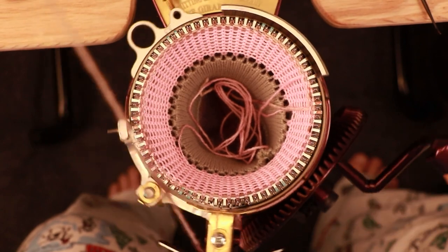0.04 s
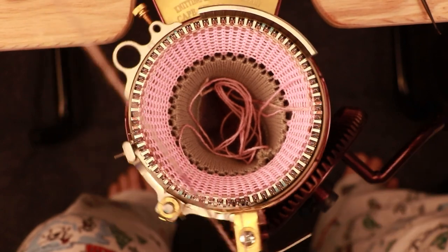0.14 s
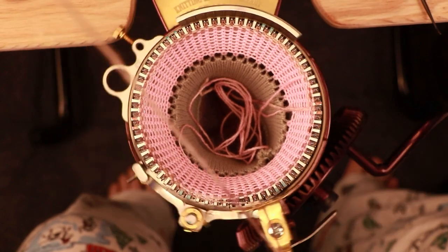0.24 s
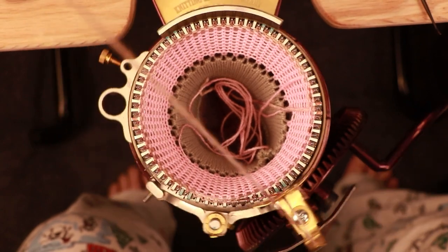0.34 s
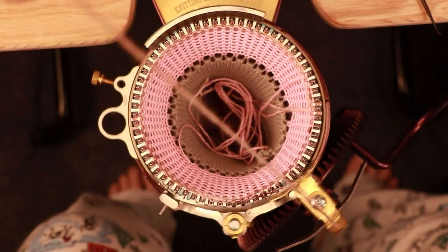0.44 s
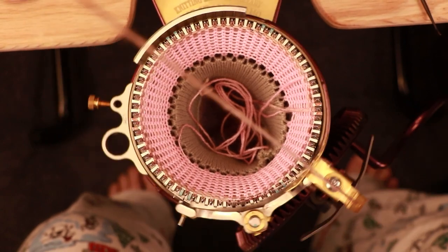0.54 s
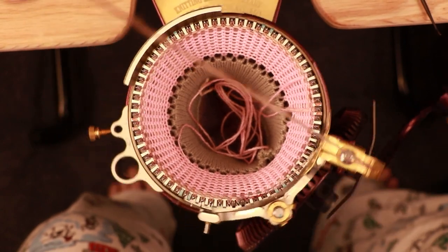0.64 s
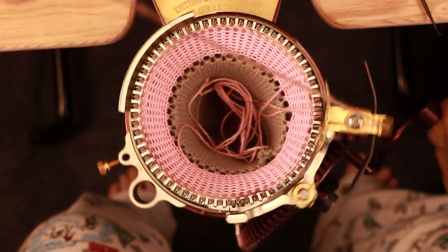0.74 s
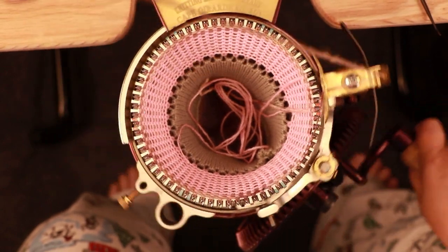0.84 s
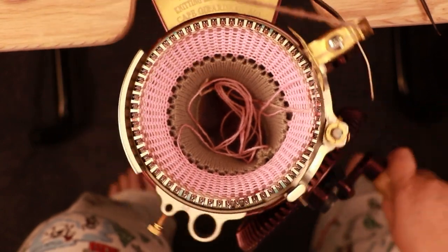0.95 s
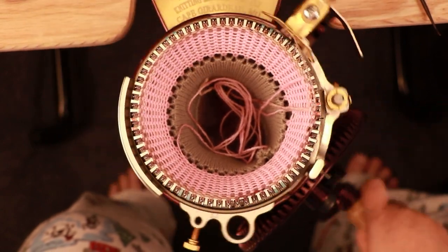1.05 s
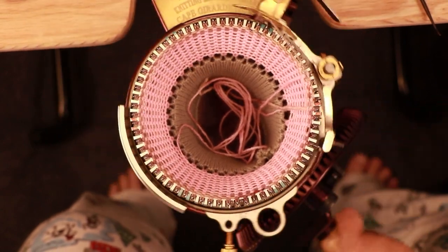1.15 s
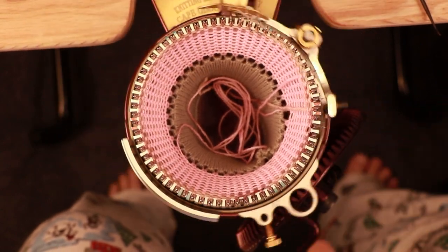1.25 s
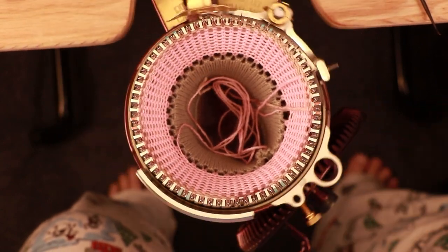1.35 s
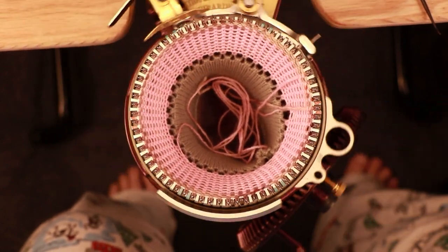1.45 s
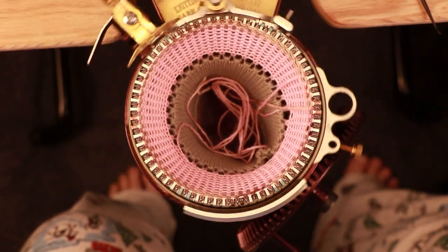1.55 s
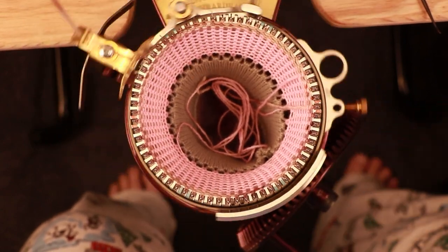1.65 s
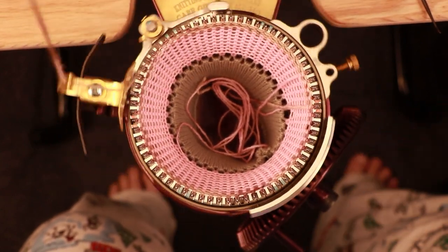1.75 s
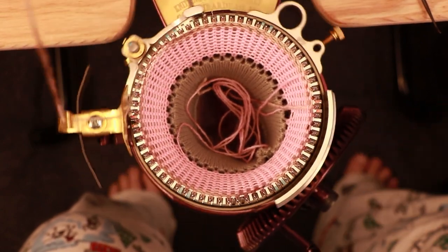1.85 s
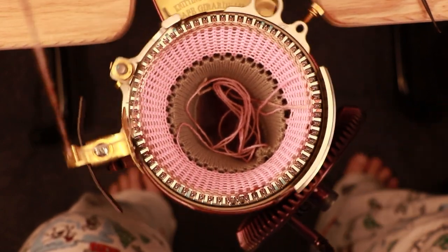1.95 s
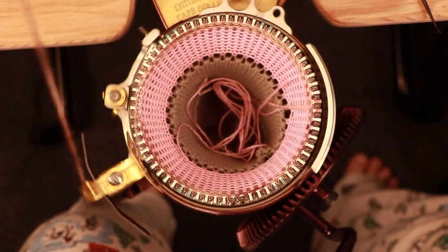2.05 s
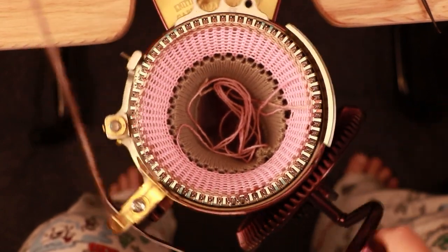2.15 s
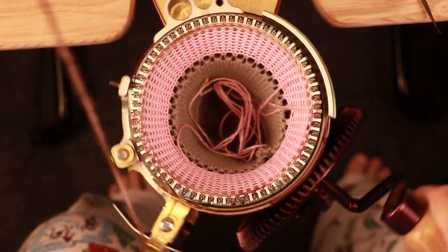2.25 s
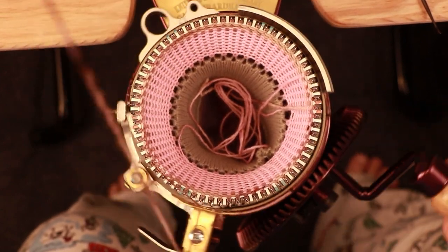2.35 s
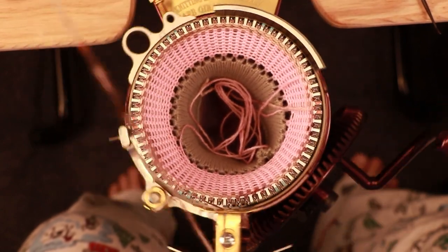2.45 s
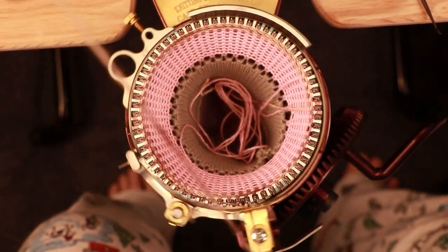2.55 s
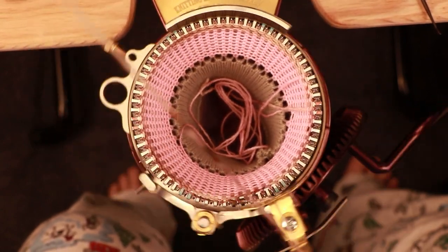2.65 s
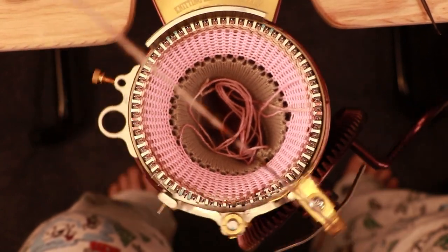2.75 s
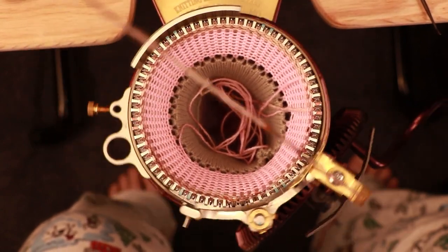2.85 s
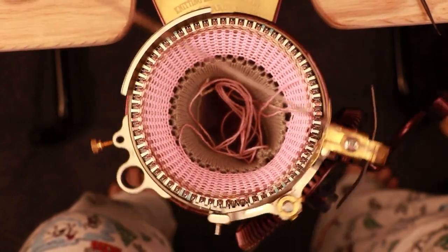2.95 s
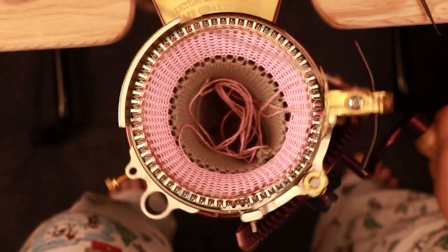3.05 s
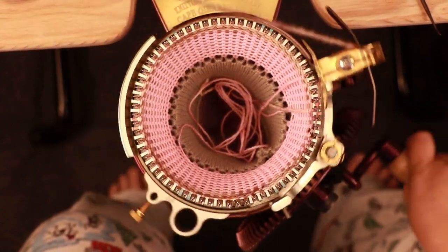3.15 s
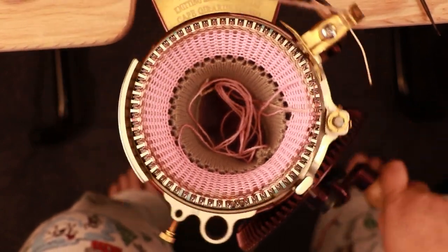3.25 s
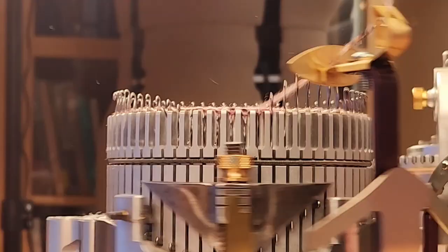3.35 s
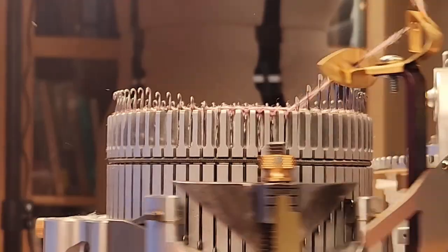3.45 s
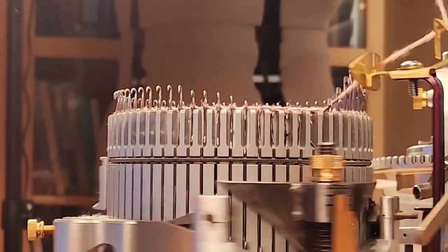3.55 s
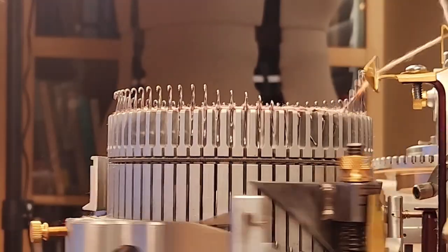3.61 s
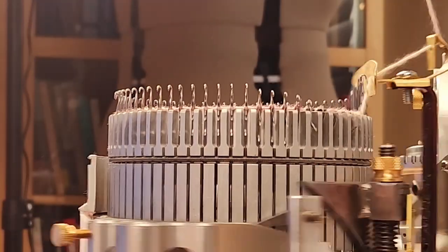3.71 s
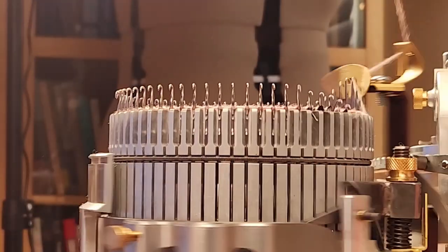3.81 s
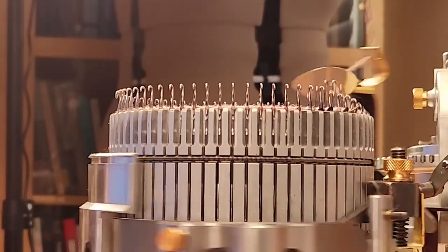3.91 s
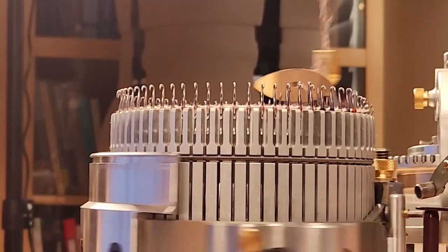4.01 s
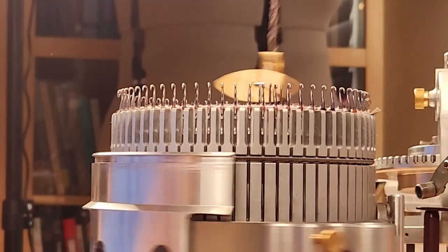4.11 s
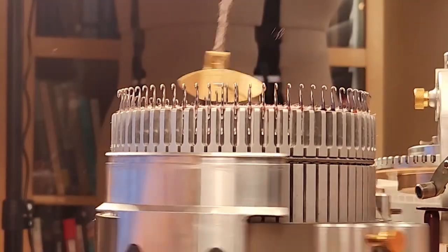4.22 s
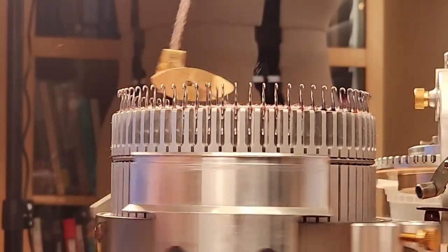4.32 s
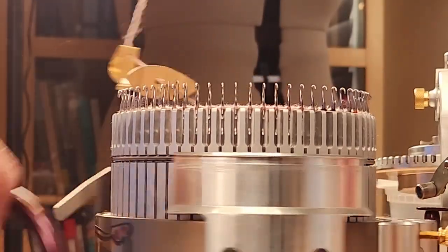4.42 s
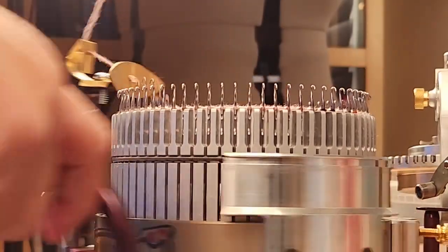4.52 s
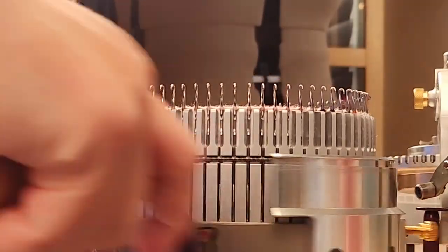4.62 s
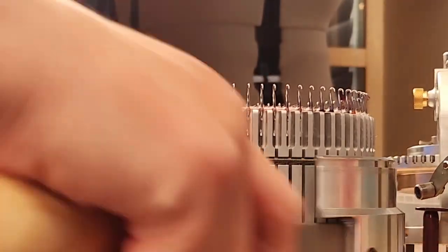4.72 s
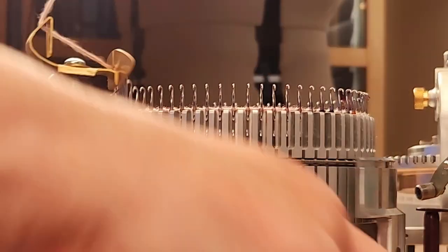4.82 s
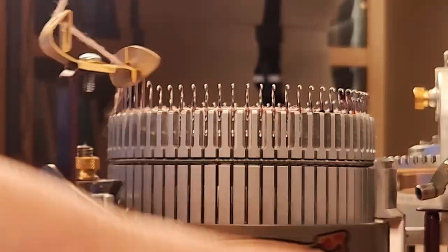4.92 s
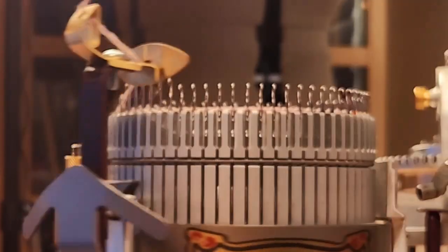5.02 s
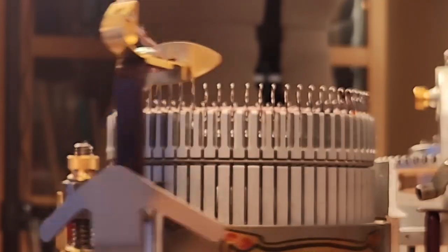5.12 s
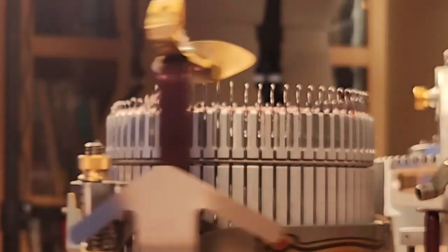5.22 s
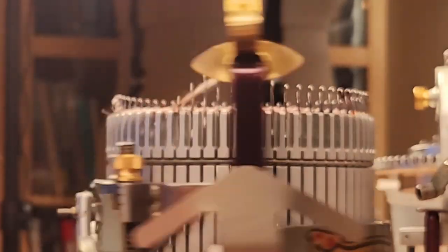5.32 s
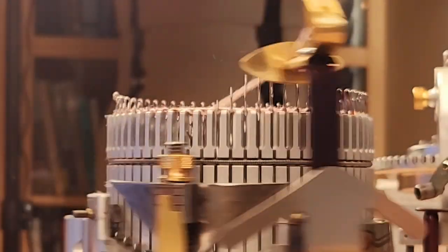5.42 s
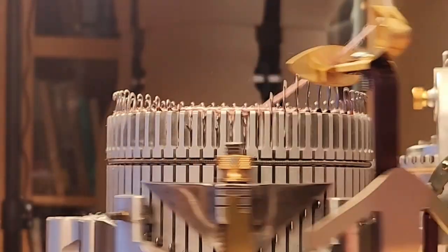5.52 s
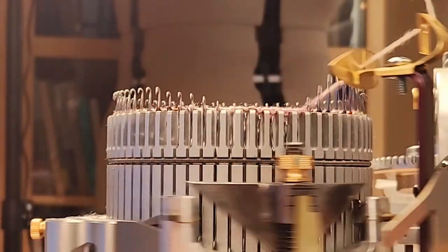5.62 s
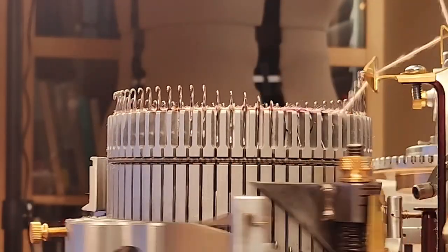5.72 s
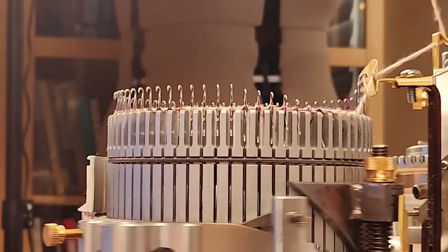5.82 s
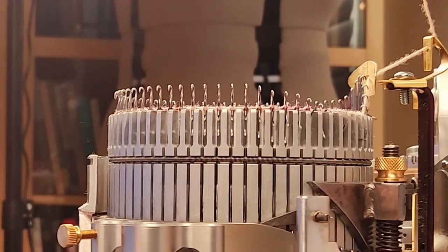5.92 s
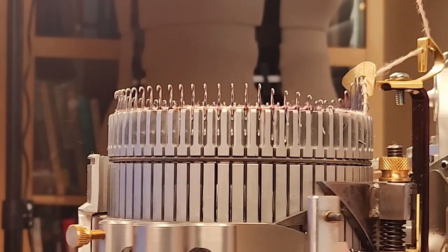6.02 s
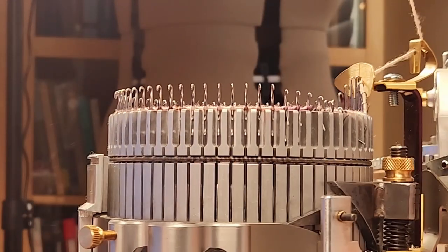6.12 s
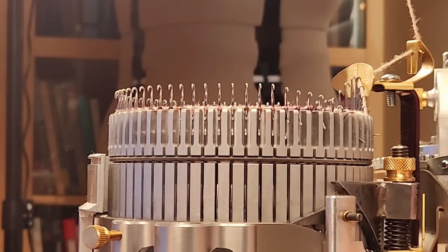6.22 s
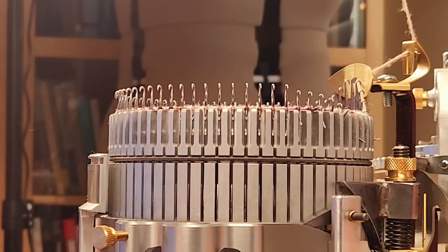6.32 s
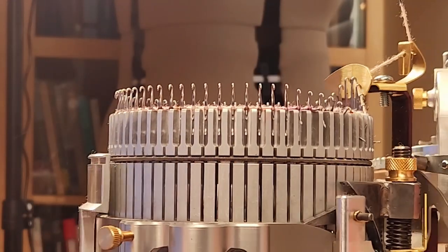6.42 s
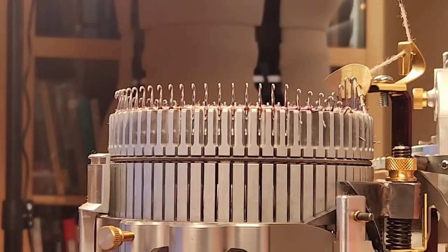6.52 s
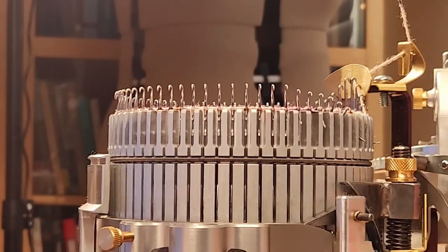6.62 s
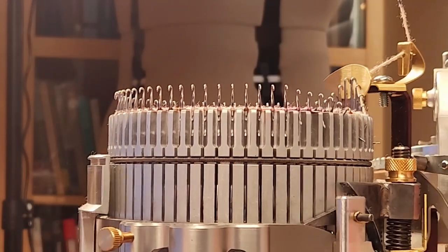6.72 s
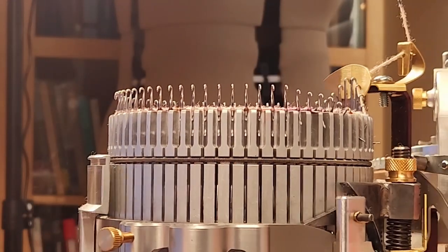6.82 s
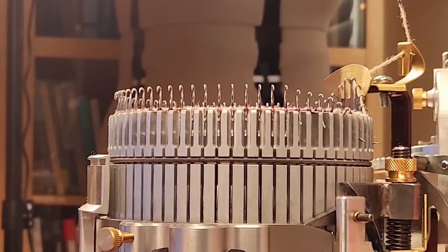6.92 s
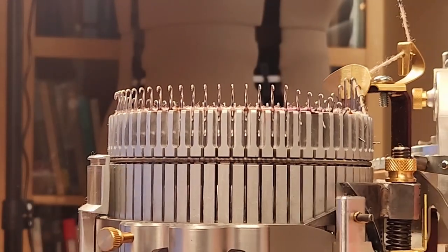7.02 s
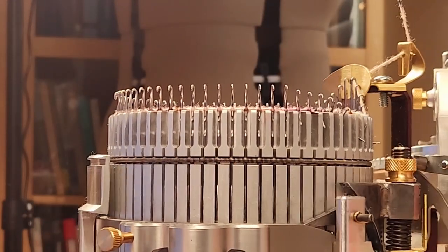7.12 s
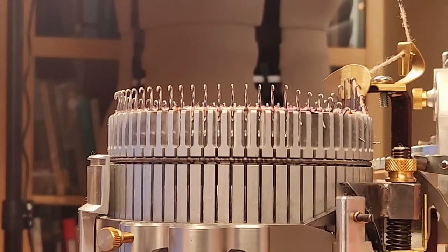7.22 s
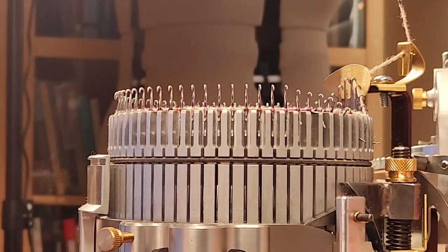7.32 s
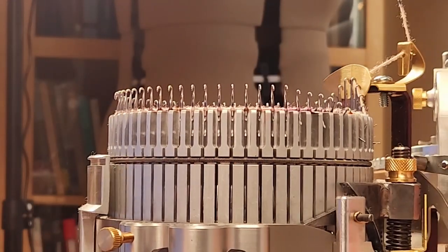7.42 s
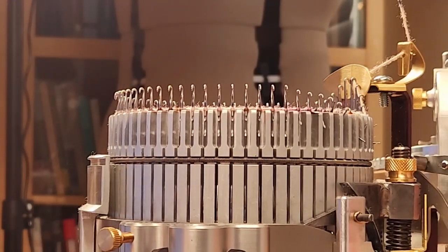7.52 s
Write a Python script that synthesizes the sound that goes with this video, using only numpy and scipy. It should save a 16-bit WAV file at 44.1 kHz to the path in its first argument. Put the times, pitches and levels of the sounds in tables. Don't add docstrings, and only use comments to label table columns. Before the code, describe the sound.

A hand-cranked circular knitting machine clatters close by, bright steel needles snapping rapidly in an uneven stream, then slows and stops in a quiet humming room.

```python
import sys
import numpy as np
from scipy import signal
from scipy.fft import rfft, irfft
from scipy.io import wavfile
from scipy.ndimage import uniform_filter1d

SR = 44100
rng = np.random.default_rng(int(sys.argv[2]) if len(sys.argv) > 2 else 0)


def transcribe(signal):
    frames = np.atleast_2d(signal).T
    limited = np.clip(frames, -1, 1)
    pcm = np.round(limited * 32767).astype(np.int16)
    wavfile.write(sys.argv[1], SR, pcm)


def undo_db(level):
    steps = np.asarray(level, float) / 20
    return 10 ** steps


N = 333396
SIZE = 2048
SLOT_COUNT = 64
NEEDLE_COUNT = 164
USUAL_PER_S = 29


# t/s, level/dB
LAST_SNAPS = [
    (5.9244, -21),
    (6.0378, -24),
    (6.27, -20),
]
# waves per turn, depth/dB, slot of a crest
SNAP_WAVES = [(1, 1.0, 29), (9, 0.6, 4.8), (5, 0.86, 11.6), (7, 0.56, 4.8), (14, 0.42, 3.37)]
# waves per turn, depth/dB, slot of a crest
RATTLE_WAVES = [(1, 0.8, 41), (20, 1.2, 0.41), (31, 1.0, 1.5)]
# waves per turn, depth/dB, slot of a crest
RING_WAVES = [
    [(3, 2.2, 11.6), (5, 1.4, .6), (1, 0.92, 25), (15, 0.31, 2.9)],
    [(3, 3.1, 11), (9, 0.75, 6.4), (19, 0.78, 1.9), (1, 0.65, 23), (4, 1.2, 16.5)],
    [(1, 2.3, 25.3), (4, 1.5, 1.52), (8, 1.3, 1.9), (2, 1.4, 2.3), (3, 0.89, 15.3)],
    [(1, 2, 53), (14, 1.8, 3.43), (4, 1.7, 1.8), (13, 0.79, 4.4), (2, 1.2, 7.4)],
    [(1, 0.6, 42), (4, 1.7, 4.2), (5, 1.4, 1.8), (21, 1.3, 0.74), (8, 1.2, 1.1)],
]
RINGS_DB = [-2.1, -0.34, 0.6, 1.4, 2]
CLAMP_DB = [-4, 0.5, 5.5, 4.5, 3]


def needles():
    last_s, last_db = np.transpose(LAST_SNAPS)
    s = np.append(snap_times(), last_s)
    slot = np.arange(len(s)) % SLOT_COUNT
    steady_db = -20.5 + waves(SNAP_WAVES, slot) + 0.9 * rng.standard_normal(SLOT_COUNT)[slot]
    peak_db = np.append(steady_db[:NEEDLE_COUNT], last_db)
    rings_db = RINGS_DB + np.transpose([waves(rows, slot) for rows in RING_WAVES])
    clamp_slot, clamp_width = 40.5, 5.5
    near_clamp = np.exp(-((slot - clamp_slot) / clamp_width) ** 2)
    rings_db += np.outer(near_clamp, CLAMP_DB)
    rattle_db = -9.5 + waves(RATTLE_WAVES, slot) + 1.2 * rng.standard_normal(SLOT_COUNT)[slot]
    return place(s, impacts(peak_db - 4.5, rattle_db, rings_db, slot))


# f/Hz, width/Hz, level/dB
CRACK = [(4800, 5700, -12.5), (6750, 2400, 2.5)]
# waves per turn, depth/dB, slot of a crest
CRACK_WAVES = [(1, 2.5, 40), (3, 0.8, 26), (11, 1.5, 5.2)]


def impacts(peak_db, rattle_db, rings_db, slot, rattle_s=.0046):
    count, t, hz = len(peak_db), np.arange(SIZE) / SR, np.fft.rfftfreq(SIZE, 1 / SR)
    mode_count = len(STEEL)
    chance = rng.standard_normal((SLOT_COUNT, mode_count + 2))[slot]

    knocks = rng.standard_normal((SLOT_COUNT, SIZE))[slot] + 0.45 * rng.standard_normal((count, SIZE))
    knocks *= rng.random((SLOT_COUNT, SIZE))[slot] < .6
    rebound_s = .0037 * (1 + chance[:, -1:] / 10)
    since = t - rebound_s
    rebound = undo_db(2.1 * chance[:, -2:-1]) * (since > 0) * np.exp(-abs(since) / 0.00091)
    chatter = undo_db(-3.0) * np.exp(-t / 0.00073)
    fade = np.exp(-t / rattle_s)
    rattle = undo_db(rattle_db - 4.0)[:, None] * knocks * (1 + chatter + rebound) * fade

    centres = [2400, 2900, 4700, 5500, 6800, 8300, 10500]
    ring_rows = np.eye(len(centres))[[0, 3, 4, 5, 6]]
    bumps = np.array([read(np.transpose([centres, row]), hz) for row in ring_rows])
    mode_gains = undo_db(1.3 * chance[:, :mode_count, None])
    body = causal(steel(hz, mode_gains) + rings_db @ bumps)

    crack = undo_db(0.2 + waves(CRACK_WAVES, slot))[:, None] * ringing(CRACK, hz)
    blow = 0.56 * hz / (hz + 4000) + crack
    sounds = irfft((blow + rfft(rattle)) * body)
    energy = np.linalg.norm(sounds, axis=1, keepdims=True)
    return undo_db(peak_db + 12.0)[:, None] * sounds / energy


# waves per turn, depth/dB, slot of a crest
LATCH_WAVES = [(1, 2.4, 47.0), (3, 2.0, 2.0), (4, 2.3, 4.8), (30, 1.0, 1.5), (21, 1.5, 0.88)]
LATCH_RINGS_DB = [-7, 2., 5.5, 6.5, 10]
BUTT_RINGS_DB = [-1, 4.5, 9, 4., -2.5]


def latches(share, below_db, rings_db, scatter):
    s = snap_times()
    gap = np.diff(s)
    chance, slot = rng.standard_normal((len(gap), 2)), np.arange(len(gap)) % SLOT_COUNT
    level_db = below_db - 11.5 + waves(LATCH_WAVES, slot) + 4.8 * chance[:, 0]
    level_db += 0.64 * (1 / gap - USUAL_PER_S)
    same = np.ones((len(slot), 1))
    sounds = impacts(level_db, 3.0 * same[:, 0], same * rings_db, slot, rattle_s=.0025)
    return place(s[:-1] + gap * np.clip(share + scatter * chance[:, 1], 0, 1), sounds)


# t/s, level/dB, jangle of the steel/dB
LEVER = [
    (1.457, -39.5, 7),
    (3.739, -39, 5),
    (6.114, -39, 9.5),
]
# t/s, level/dB
DRAG = [
    (1.519, -52),
    (1.554, -45),
    (1.565, -44.5),
    (1.579, -46),
    (1.592, -46),
    (3.809, -51.5),
    (3.824, -48),
    (3.839, -42),
    (3.854, -42.5),
    (3.869, -49),
]
# f/Hz, width/Hz, level/dB
LEVER_MODES = [(620, 60, -7), (850, 30, -1), (1150, 120, -9), (1380, 60, 2), (1560, 80, -2), (2090, 60, -6),
               (2840, 30, 3)]


def lever():
    drag_jangle_db = 7.0
    s, peak_db, jangle_db = np.transpose(LEVER + [(*row, drag_jangle_db) for row in DRAG])
    free = (np.arange(len(s)) < len(LEVER))[:, None]
    t, hz = np.arange(SIZE) / SR, np.fft.rfftfreq(SIZE, 1 / SR)
    burst_s = np.where(free, 0.0044, .018)
    burst = rng.standard_normal((len(s), SIZE)) * np.exp(-t / burst_s)
    drive = rfft(burst) + free * undo_db(7.5) * 5
    damped_modes = np.multiply(LEVER_MODES, [1, 4, 1])
    pressed = ringing(damped_modes, hz) / (1 + 1j * hz / 1900) ** 3
    modes = np.where(free, ringing(LEVER_MODES, hz), pressed)
    dull = irfft(drive * modes)
    bright = irfft(drive * causal(steel(hz) - 5.9 / (1 + (hz / 5500) ** 8)))
    dull, bright = (v / abs(v).max(1, keepdims=True) for v in (dull, bright))
    return place(s, undo_db(peak_db + 0.5)[:, None] * (dull + undo_db(jangle_db)[:, None] * bright))


# t/s, level/dB, rattle/dB, low ring/dB
STRAYS = [(1.383, -28, 3, -30), (3.6552, -29, -13, -29), (5.798, -33.5, -3, -1), (5.849, -43, -3, -22),
          (5.988, -45.5, 8, -13), (6.152, -51, -3, -30), (6.19, -59, -6, -24), (5.884, -58, -3, -9),
          (6.23, -48.5, 5, 17), (6.3036, -47, -1, -21), (6.804, -70.5, -2, -15)]


def strays():
    s, peak_db, rattle_db, low_db = np.transpose(STRAYS)
    rings_db = np.outer(low_db + 1.5, np.eye(5)[0])
    return place(s, impacts(peak_db - 2.0, rattle_db, rings_db, np.arange(len(s))))


# t/s, level/dB, f/Hz
THUMPS = [
    (3.354, -49, 530),
    (3.429, -47.5, 552),
    (3.459, -50, 442),
    (3.487, -48, 570),
]


def thumps():
    s, peak_db, hz = (c[:, None] for c in np.transpose(THUMPS))
    t = np.arange(SIZE) / SR
    shape = np.exp(-t / .012) * (1 - np.exp(-t / 0.0016))
    return place(s[:, 0], undo_db(peak_db + 0.5) * np.sin(2 * np.pi * hz * t) * shape)


# waves per turn, depth/dB, slot of a crest
RUB_WAVES = [(1, 1, 49), (3, 2.3, .4)]
# f/Hz, level/dB per Hz
GEARS = [(180, -30.5), (300, -17.5), (534, -7), (1210, -11.5), (2200, -9), (3600, -29), (5500, -57.5)]


def crank():
    t, s = np.arange(N) / SR, snap_times()
    faster = np.interp(t, *np.transpose(CRANK_SPEED)) - USUAL_PER_S
    stalled = np.maximum(t - s[-1], 0)
    slot = np.interp(t, s, np.arange(len(s)))
    rub_db = -58.0 + 0.33 * faster + waves(RUB_WAVES, slot) - 215 * stalled
    gear_db = -60 + 0.3 * faster - 64 * stalled
    rub = noise(lambda hz: undo_db(steel(hz)) / (1 + (hz / 11500) ** 2), patchy_db=2.0, size=256)
    slips = undo_db(3 * rng.exponential(1, N)) * (rng.random(N) < 400 / SR)
    slip_fade = np.exp(-1 / (.0015 * SR))
    rub = evened(rub * (1 + evened(signal.lfilter([1], [1, -slip_fade], slips))))
    gears = noise(lambda hz: undo_db(read(GEARS, hz)), patchy_db=2.0)
    return undo_db(rub_db) * rub + undo_db(gear_db) * gears


# t/s, needles per second
CRANK_SPEED = [(0.0, 22.462), (0.356, 23.41), (0.525, 16.519), (1.045, 34.975), (1.199, 27.222),
               (1.414, 33.884), (2.109, 25.346), (2.86, 25.279), (3.136, 31.026), (3.681, 29.318),
               (3.787, 35.536), (4.038, 28.457), (4.192, 31.953), (4.701, 29.853), (4.982, 18.991),
               (5.17, 30.192), (5.618, 36.94), (5.82, 14.98)]
UNEVEN = [(4, 0.137, 10.72), (5, 0.153, 4.47), (6, 0.027, 2.68), (10, 0.019, 1.61), (9, 0.019, 4.04),
          (8, 0.019, 7.38), (11, 0.011, 2.63)]


def snap_times():
    t, slot = np.arange(N) / SR, np.arange(NEEDLE_COUNT)
    first_s = .0262
    passed = np.cumsum(np.interp(t, *np.transpose(CRANK_SPEED))) / SR
    due = slot + waves(UNEVEN, slot) - waves(UNEVEN, 0)
    return np.interp(due, passed - passed[round(first_s * SR)], t)


# f/Hz, width/Hz, level/dB
STEEL = [(2200, 250, -6), (2440, 120, 2), (2690, 160, -1), (3230, 220, -1), (4460, 170, -2), (5520, 160, 2),
         (6720, 180, 2), (7080, 350, -1), (8260, 130, 0), (8500, 200, -2), (10100, 350, -2),
         (11550, 300, -5)]
# f/Hz, level/dB per Hz
SNAP = [(600, -40), (1150, -8), (2430, 7), (5130, 4), (6800, 4), (9110, -1.5), (10000, -0.5), (15000, -4),
        (16000, -26)]


def steel(hz, gains=1):
    f, width, db = (c[:, None] for c in np.transpose(STEEL))
    peaks = (gains * undo_db(db + 5.0)) ** 2 / (1 + (2 * (hz - f) / width) ** 2) * (hz / f) ** 2
    modes = peaks.sum(-2) / (1 + (1500 / (hz + 1)) ** 8)
    return 10 * np.log10(undo_db(read(SNAP, hz) - 2.5) ** 2 + modes)


# f/Hz, time to fall 60 dB/s
ROOM = [(500, 0.72), (1500, 0.26), (2600, 0.45), (4500, 0.36), (7000, 0.12), (14000, 0.21)]


def room(x, first_s=0.0065, turns_per_s=7.3):
    taps = np.zeros((3, SR // 2))
    at = np.arange(round(first_s * SR), SR // 2 - 20, 12)
    shift = rng.integers(0, 12, (3, len(at)))
    sign = rng.choice([-1., 1.], (3, len(at)))
    np.put_along_axis(taps, at + shift, sign, 1)
    hz, t, z = signal.stft(taps, SR, nperseg=256)
    tail = signal.istft(z * undo_db(-60 * t / read(ROOM, hz)[:, None]), SR, nperseg=256)[1]
    turn = turns_per_s * np.arange(N) / SR + np.arange(3)[:, None] / 3
    feed = np.sqrt(2 / 3) * np.cos(2 * np.pi * turn)
    return signal.fftconvolve(x * feed, tail / np.linalg.norm(tail[0]), axes=1)[:, :N].sum(0)


# f/Hz, level/dB per Hz
AIR = [(12, -55.5), (20, -27), (87, -20), (156, -4), (237, -15), (325, -12), (418, -16.5), (455, -14),
       (494, -20.5), (721, -23), (801, -22.5), (2200, -38), (3900, -53.5), (6600, -72)]
# f/Hz, width/Hz, level/dB
FAN = [(70.4, 17, -79.5), (163.5, 19, -71.5), (318.6, 42, -78.5), (455.2, 3.8, -73), (1297, 130, -83)]
# f/Hz, level/dB per Hz
HISS = [(1760, -28), (3000, -2.5), (4610, 0), (12700, -7.5), (16500, -45), (22000, -120)]


def air():
    hums = 0
    for f, width, db in FAN:
        hums = hums + undo_db(db) * noise(lambda hz: abs(ringing([(f, width, 0)], hz)) ** 2, 0, size=8192)
    hiss = undo_db(-91.5) * noise(lambda hz: undo_db(read(HISS, hz)), patchy_db=0.7)
    moving_air = undo_db(-63.0) * noise(lambda hz: undo_db(read(AIR, hz)), patchy_db=-0.36, size=2048)
    return moving_air + hums + hiss


def waves(rows, slot):
    return sum(depth * np.cos(2 * np.pi * per_turn * (slot - crest) / SLOT_COUNT)
               for per_turn, depth, crest in rows)


def evened(x):
    return x / np.sqrt(np.mean(x ** 2) + 1e-20)


def read(points, hz):
    f, value = np.transpose(points)
    return np.interp(np.log(hz + 1), np.log(f + 1), value)


def causal(db):
    log_gain = np.log(undo_db(np.maximum(db, -100)))
    circle = np.concatenate([log_gain, log_gain[..., -2:0:-1]], axis=-1)
    return np.exp(np.conj(signal.hilbert(circle)))[..., :log_gain.shape[-1]]


def ringing(modes, hz):
    f, width, db = (c[:, None] for c in np.transpose(modes))
    sign = (-1.) ** np.arange(len(modes))[:, None]
    return (sign * undo_db(db) * 1j * hz * width / (f ** 2 - hz ** 2 + 1j * hz * width)).sum(-2)


def noise(gain, patchy_db=1.5, size=1024):
    hz = np.fft.rfftfreq(size, 1 / SR)
    a, b, patches = rng.standard_normal((4 * N // size + 5, len(hz), 3)).T
    patches = evened(uniform_filter1d(uniform_filter1d(patches, 10, axis=0), 10, axis=1))
    z = (a + 1j * b) * gain(hz)[:, None] * undo_db(patchy_db * patches)
    return evened(signal.istft(z, nperseg=size, noverlap=3 * size // 4)[1][:N])


def place(seconds, sounds):
    out = np.zeros(N + SIZE)
    fade = np.cos(np.linspace(0, np.pi / 2, SIZE)) ** 2
    for s, sound in zip(seconds, sounds * fade):
        out[round(s * SR):][:SIZE] += sound
    return out[:N]


def scene():
    hits = needles() + lever() + strays() + thumps()
    hits += latches(share=.51, below_db=-30.0, rings_db=LATCH_RINGS_DB, scatter=.012)
    hits += latches(share=.88, below_db=-37.0, rings_db=BUTT_RINGS_DB, scatter=.015)
    return (hits + undo_db(-12.0) * room(hits) + crank() + air())[None]


def roll_off(x):
    return signal.sosfilt(signal.butter(12, 16980, fs=SR, output="sos"), x)


# f/Hz, level/dB
EDGE = [(15000, 0), (15700, 4), (15900, -7), (16500, -11), (16800, -46), (17000, -100)]


def record(dry):
    limited = irfft(rfft(dry) * undo_db(read(EDGE, np.fft.rfftfreq(N, 1 / SR))), N)
    return roll_off(limited)


dry = scene()
out = record(dry)
transcribe(out)
```